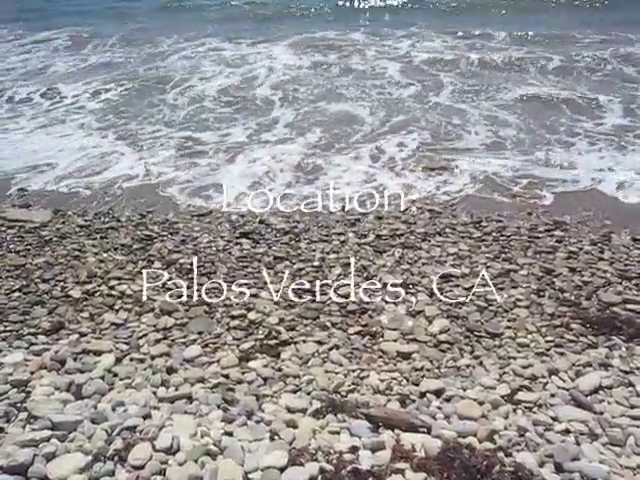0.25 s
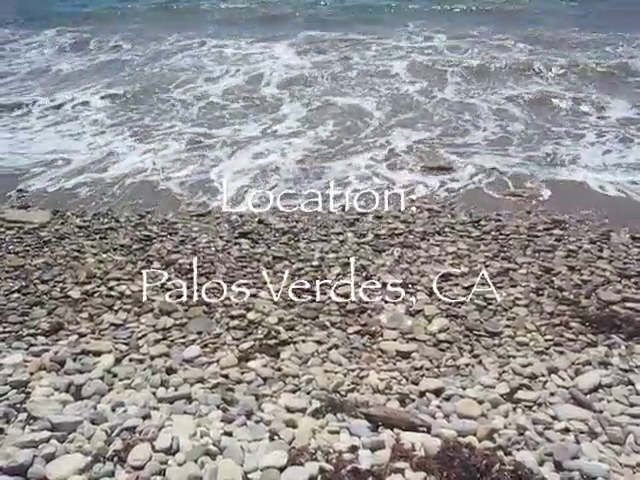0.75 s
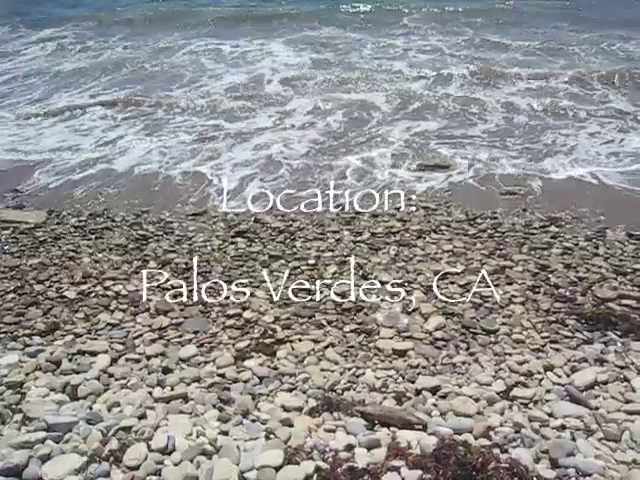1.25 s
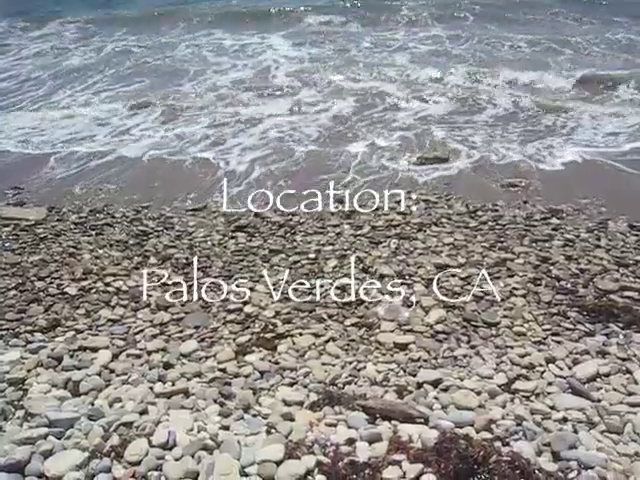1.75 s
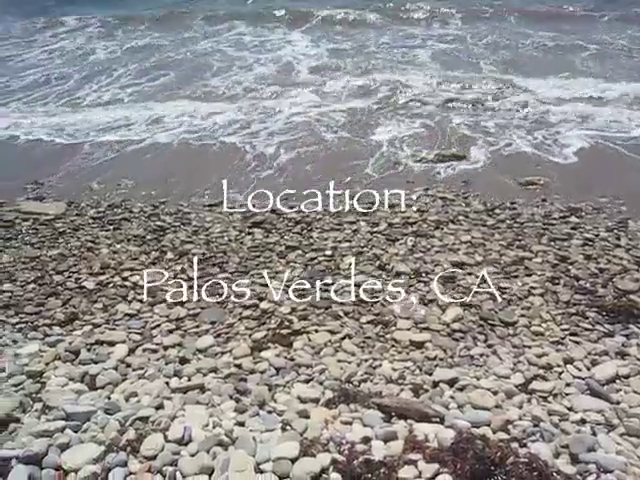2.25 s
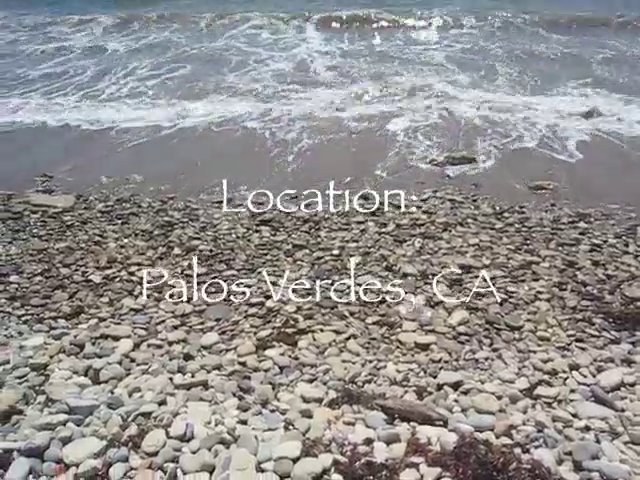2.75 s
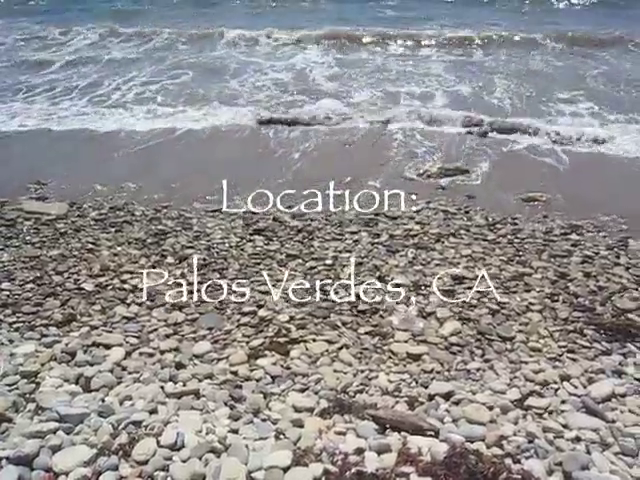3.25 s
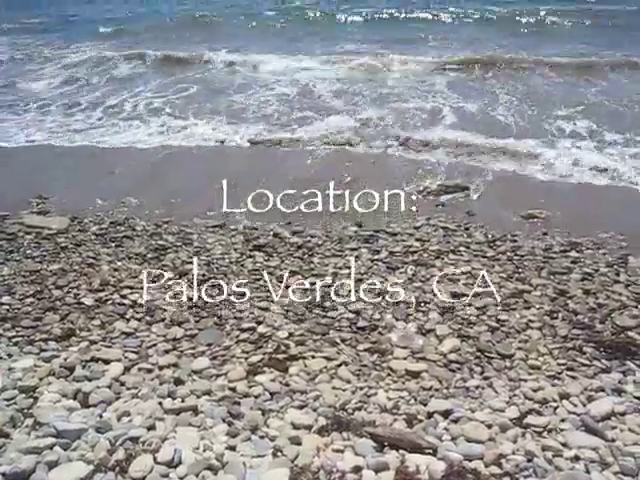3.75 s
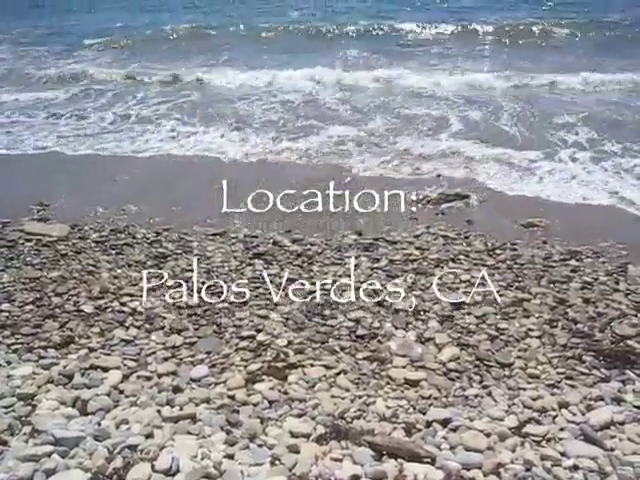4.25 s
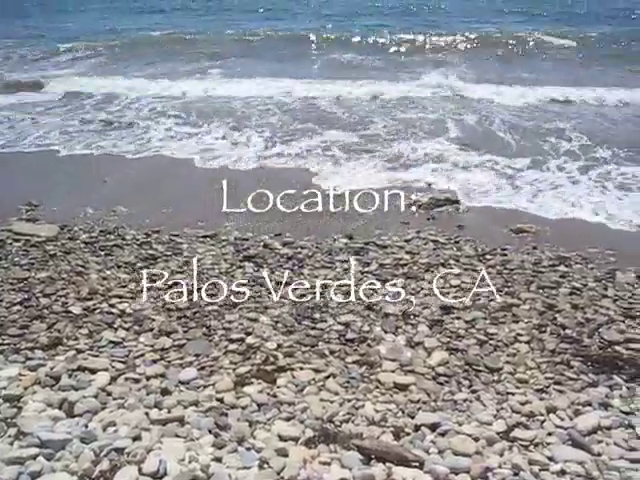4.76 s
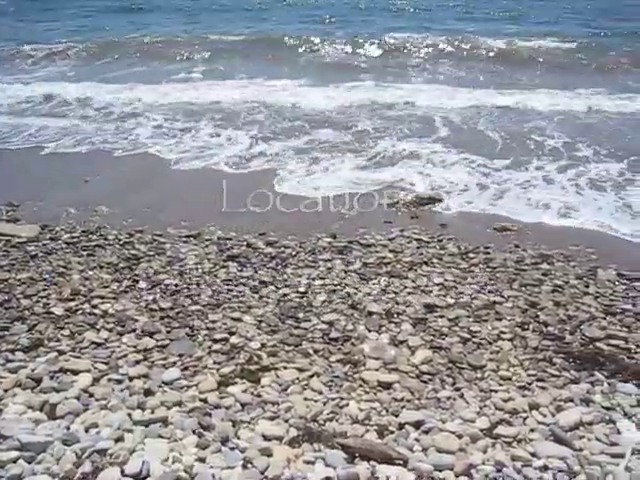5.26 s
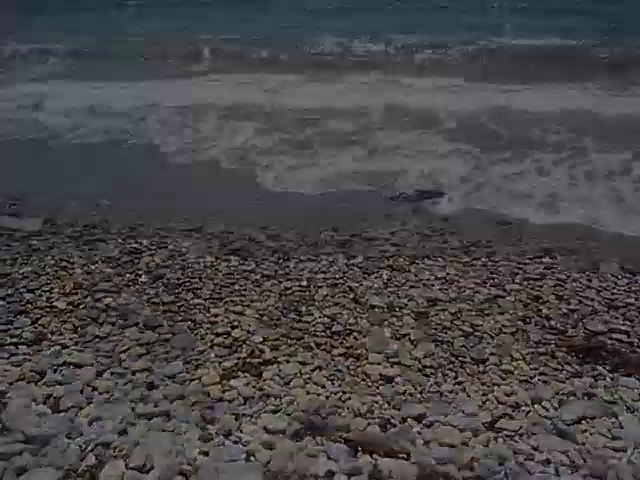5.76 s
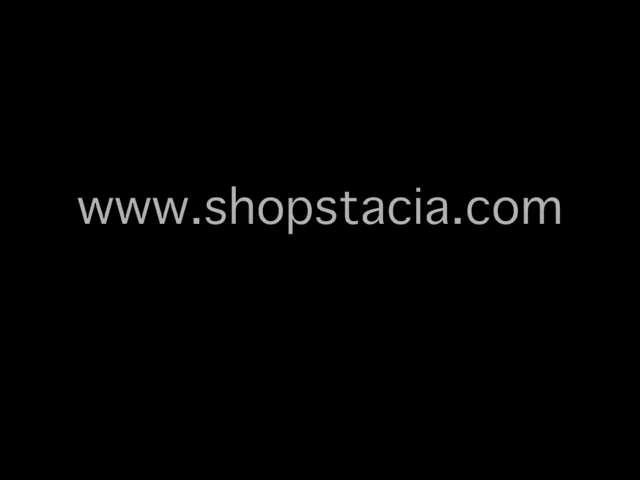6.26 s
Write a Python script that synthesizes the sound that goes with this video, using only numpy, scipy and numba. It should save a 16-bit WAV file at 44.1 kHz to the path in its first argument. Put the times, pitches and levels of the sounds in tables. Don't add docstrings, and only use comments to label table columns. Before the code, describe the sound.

A nearly mono pocket-camera sound close to a pebble shore. From 0 s a fairly soft foam hiss, with fizzing bubbles and fine crackle, carries a hollow tone around 1 kHz. Pebbles knock at about 0.2, 0.8 and 1.3 s, with more clicks to 1.6 s; watery gulps sound near 0.6 and 1.4 s. The wash swells to its fullest around 1.8 s, as distant breakers rumble near 2 s and wind buffets the microphone in low, fluttering thumps from 1.6 to 2.7 s. A tight, loud clatter of stones with gulps hits at 2.8-2.9 s, followed by knocks near 3.1 s. From 3.5 s the broad splashy wash stays steady, with a few clicks around 3.7-4.2 s, a gulp at 5 s and lighter wind bumps. Loud knocks briefly duck the level. At 5.5 s everything begins fading, stopping dead near 5.9 s; silence follows to about 6.4 s.

```python
import sys
import numpy as np
from scipy import signal
from scipy.io import wavfile
from scipy.ndimage import map_coordinates
from numba import njit

SR = 44100
rng = np.random.default_rng(int(sys.argv[2]) if len(sys.argv) > 2 else 0)


def makeup_ratio(level_db):
    decades = np.asarray(level_db, float) / 20
    return 10 ** decades


def waveform_to_disk(signal):
    frames = np.transpose(np.atleast_2d(signal))
    scaled = np.clip(frames, -1, 1) * 32767
    samples = np.round(scaled).astype(np.int16)
    wavfile.write(sys.argv[1], SR, samples)


N = 286205


def unit(x):
    return x / np.sqrt(np.mean(x ** 2))


def columns(table, s):
    rows = np.transpose(table)
    return [np.interp(s, rows[0], control) for control in rows[1:]]


def filtered(x, order, corner_hz, kind):
    return signal.sosfilt(signal.butter(order, corner_hz, kind, fs=SR, output="sos"), x)


def colour_db(points, hz):
    f, db = np.transpose(points)
    db = np.interp(np.log(hz + 1), np.log(f), db, left=-90, right=-90)
    return db - 10 * np.log10(np.mean(makeup_ratio(2 * db)))


def patches(hz, s, rate, octaves):
    field = rng.standard_normal((60, 400))
    place = np.meshgrid(np.log2(hz + 20) / octaves, s * rate, indexing="ij")
    return unit(map_coordinates(field, place, order=3, mode="mirror"))


def swells(s, floor_db, peaks, rise_s, fall_s):
    late = s - peaks[0][:, None]
    distance = np.where(late < 0, -late / rise_s, late / fall_s)
    shape = np.exp(-2 * distance ** 0.67)
    bursts = np.sum(makeup_ratio(2 * peaks[1])[:, None] * shape, axis=0)
    return 10 * np.log10(makeup_ratio(2 * floor_db) + bursts)


def shaped(x, gain_db):
    window, overlap = 1024, 768
    hz, s, z = signal.stft(x, SR, nperseg=window, noverlap=overlap)
    return signal.istft(z * makeup_ratio(gain_db(hz, s)), SR, nperseg=window, noverlap=overlap)[1][:N]


@njit
def ring(start, hz, cycles, size, glide):
    out = np.zeros(N)
    for k in range(len(start)):
        n = int(6 * cycles[k] * SR / hz[k]) + 1
        z = size[k] + 0j
        turn = np.exp((2j * np.pi - 1 / cycles[k]) * hz[k] / SR)
        rise = np.exp(2j * np.pi * hz[k] / SR * glide / n)
        for i in range(start[k], min(start[k] + n, N)):
            z, turn = z * turn, turn * rise
            out[i] += z.imag
    return out


def bubbles(count, low_hz, high_hz, cycles, scatter_db, glide):
    when, pitch, length, size, sign = rng.random((count, 5)).T
    start = (when * N).astype(np.int64)
    hz = low_hz * (high_hz / low_hz) ** pitch
    size_db = np.minimum(-scatter_db * np.log(1 - size), 12)
    size = makeup_ratio(size_db) * hz * np.sign(sign - .5)
    return unit(ring(start, hz, cycles * (.5 + length), size, glide))


# t/s, strength level/dB, spray level over the wash/dB,
# hollow of the breaking wave f/Hz, its ring level/dB
WAVES = [(0.0, -28.5, -1.5, 1170, 3), (0.2, -30, -2, 1050, 1.5), (0.9, -29, -5, 1094, 1),
         (1.05, -28.5, -2.5, 1040, 1), (1.18, -26.5, -1.5, 995, 2), (1.27, -24.5, -7.5, 960, 4),
         (1.42, -26.5, 0.5, 955, -0.5), (1.55, -24.5, 0, 945, 3.5), (1.8, -21, -1, 900, 1),
         (2.3, -22.5, -1.5, 990, 0), (2.75, -24.5, -1.5, 900, -0.5), (3.05, -23.5, 0.5, 1140, 3.5),
         (3.5, -23, 1.5, 1170, 5.5), (4.1, -23, 1.5, 1090, 2.5), (4.65, -22.5, -1.5, 1070, 2),
         (5.15, -22, -1, 1016, -0.5), (5.5, -22.5, 0, 1070, 0), (5.85, -27.5, -2.5, 1026, 1)]
# f/Hz, level per Hz/dB
FOAM_COLOUR = [(120, -19.5), (200, -12.5), (340, -15), (600, 0.5), (820, -1), (1060, -2), (1400, -4),
               (2300, -6), (3000, -8), (4100, -12), (5000, -14), (7900, -22.5), (11600, -24),
               (15900, -32.5)]


def surf():
    def gain_db(hz, s):
        wash_db, spray_db, hollow_hz, ring_db = columns(WAVES, s)
        octave = np.log2(hz[:, None] / 1000 + 0.0089)
        splash = np.exp(-((octave - 1.7) / 1.17) ** 2) * spray_db
        fizz = np.clip((octave - 2.0) / 0.85, 0, 1) * (2 + 0.2 * spray_db)
        hollow = ring_db * np.exp(-((hz[:, None] - hollow_hz) / 130) ** 2)
        swell = 0.54 * patches(hz, s, rate=3.1, octaves=7.2)
        swell = swell + 0.65 * patches(hz, s, rate=16.0, octaves=1.211)
        return colour_db(FOAM_COLOUR, hz)[:, None] + wash_db + 2.5 + splash + fizz + hollow + swell

    hiss = rng.standard_normal(N)
    burst = bubbles(count=9000, low_hz=348.0, high_hz=6000., cycles=1.32, scatter_db=2.5, glide=0.1)
    crackle = bubbles(count=12000, low_hz=900., high_hz=11900.0, cycles=0.29, scatter_db=2.5, glide=0.)
    return shaped(hiss + makeup_ratio(-13.5) * burst + makeup_ratio(-14.0) * crackle, gain_db)


# f/Hz, level per Hz/dB
BUFFET_COLOUR = [(12, -51), (20, -18.5), (54, -2), (117, 1.5), (289, -8.5), (400, -11.5), (520, -45),
                 (880, -120)]
# peak t/s, buffet level/dB, time to die away/s, thump level of the largest eddies/dB
WIND_GUSTS = [(.07, -50, .06, -5), (.5, -38, 0.064, 5), (.66, -38, 0.055, 7), (.81, -32.5, 0.14, -1),
              (1.2, -41, .05, 3), (1.45, -39.5, 0.043, 7), (1.6, -27, 0.06, -2), (1.79, -34.5, 0.14, -6.5),
              (2.06, -21.5, 0.077, -18), (2.13, -24, 0.03, -20), (2.24, -30, .06, -14),
              (2.4, -27, 0.12, -3.5), (2.53, -26, 0.088, -2.5), (2.69, -26.5, 0.057, -9.5),
              (2.83, -39, .04, 2), (2.97, -33.5, 0.041, 4.5), (3.54, -43, 0.056, 2.5),
              (3.9, -37.5, 0.18, -2), (4.2, -39, .06, -5), (4.5, -41, 0.067, 2.5), (4.8, -39, .1, -1.5),
              (4.94, -30.5, .06, 2), (5.05, -35.5, 0.045, 3), (5.49, -30.5, 0.094, 1),
              (5.82, -40.5, 0.051, 0)]


def wind():
    def buffet_db(hz, s):
        peak_s, peak_db, fall_s, extra_db = np.transpose(WIND_GUSTS)
        fall_s = fall_s[:, None]
        rise_s = 0.69 * fall_s
        breeze_db = -46
        push_db = swells(s, breeze_db, (peak_s, peak_db), rise_s, fall_s)
        thump_db = swells(s, breeze_db - 5.5, (peak_s, peak_db + extra_db), rise_s, fall_s) - push_db
        large = np.clip(-np.log2(hz[:, None] / 110 + .01) / 1.8, 0, 1)
        flutter_db = 2.0 * patches(hz, s, rate=22.0, octaves=3.2)
        return colour_db(BUFFET_COLOUR, hz)[:, None] + thump_db * large + push_db + 3.5 + flutter_db

    strength_db = -1.2 * np.log(rng.random(N // 256 + 1)).repeat(256)[:N]
    eddies = rng.standard_normal(N) * makeup_ratio(strength_db)
    return shaped(unit(eddies), buffet_db)


# peak t/s, rumble level/dB
FAR_BREAKERS = [(0.0, -33), (.8, -36.5), (1.49, -30.5), (1.95, -23.5), (2.3, -33), (2.65, -27.5),
                (3.1, -34.5), (3.5, -37.5), (4.15, -35.5), (4.75, -40.5), (5.25, -30.5), (5.55, -37.5)]


def far_breakers():
    def rumble_db(hz, s):
        far = colour_db([(90, -33.0), (170, -1), (280, -3.5), (400, -6.5), (600, -23.0)], hz)
        fall_db = swells(s, -37, np.transpose(FAR_BREAKERS), rise_s=0.13, fall_s=.12)
        return far[:, None] + fall_db + 0.8 + 1.7 * patches(hz, s, rate=7.4, octaves=1.5)

    return shaped(rng.standard_normal(N), rumble_db)


# t/s, peak level/dB, f/Hz, ring/cycles
WATER_GULPS = [(.083, -14, 610, 1.5), (.6172, -9, 600, 1.3), (.847, -16, 700, 1.5), (1.107, -14, 700, 1.4),
               (1.3695, -4, 820, 1.1), (2.156, -10, 660, 1.5), (2.9025, -8, 750, 1.2),
               (2.9115, -4, 1050, 1.5), (3.198, -10, 684, 1.5), (5.011, -9, 592, 1.5),
               (5.554, -11, 1096, 1.5)]


def gulps():
    s, peak_db, hz, cycles = np.transpose(WATER_GULPS)
    rings = ring((s * SR).astype(np.int64), hz, cycles, makeup_ratio(peak_db - 0.5), 0.27)
    return filtered(rings, 2, 300, "high")


# t/s, level/dB, lowest f/Hz, highest f/Hz
TREBLE_PUFFS = [(0.107, -48.0, 6300, 7500), (0.343, -46.0, 5200, 13300), (0.805, -48.0, 4200, 5100),
                (1.993, -48.0, 11700, 13000), (2.433, -39.0, 4300, 5100), (2.526, -39.0, 4200, 7900),
                (2.546, -47.0, 4200, 7900), (2.571, -40.0, 4200, 5000), (3.06, -46.0, 8300, 10000),
                (3.267, -38.0, 4600, 11300), (4.428, -42.0, 6900, 15300), (4.868, -39.0, 5700, 6800),
                (4.965, -37.0, 4200, 5100), (5.034, -45.0, 11000, 12700)]


def widenings():
    half = 1024
    side = np.zeros(N)
    for s, db, low_hz, high_hz in TREBLE_PUFFS:
        noise = filtered(rng.standard_normal(2 * half), 6, [low_hz, high_hz], "band")
        middle = int(s * SR)
        side[middle - half:middle + half] += makeup_ratio(db + 1) * unit(noise) * np.hanning(2 * half)
    return side * np.array([[1], [-1]])


# t/s, peak level/dB, lowest ring f/Hz, highest ring f/Hz, rattle length/ms
STONE_KNOCKS = [(.132, -15.5, 1000, 2400, 8.6), (0.1826, -7, 890, 3900, 7.1), (.449, -15, 2000, 3300, 6),
                (.663, -15, 1190, 3020, 7.5), (0.8212, -9.5, 900, 4240, 4), (1.2744, -7, 2070, 6270, 2.6),
                (1.404, -12, 1500, 4500, 3), (1.422, -10, 1300, 3000, 3.5), (1.4617, -12.5, 696, 2480, 2.3),
                (1.547, -17.5, 1010, 5000, 6), (1.576, -12, 1490, 6500, 5.8), (2.828, -8, 672, 2640, 4.7),
                (2.8832, -6, 1510, 6000, 2), (2.886, -7, 600, 2300, 1.8), (2.894, -10.5, 1300, 2800, 2.5),
                (2.9108, -3, 2500, 3400, 2.2), (2.911, -6, 4400, 5500, 2.2), (2.92, -6.5, 1812, 2800, 1.5),
                (3.039, -6, 995, 4480, 2), (3.097, -10.5, 900, 5470, 3.4), (3.701, -12, 2180, 4800, 2.7),
                (3.911, -11.5, 2500, 5000, 3), (4.128, -6, 803, 2830, 10), (4.205, -12, 2500, 8000, 1.7)]


def knocks(count):
    out = np.zeros(N)
    for s, peak_db, low_hz, high_hz, length_ms in STONE_KNOCKS:
        when, size, pitch = rng.random((3, count))
        when[::5] *= .1
        start = (SR * (s + when * length_ms / 1000)).astype(np.int64)
        hz = low_hz * (high_hz / low_hz) ** ((np.arange(count) + pitch) / count)
        force = np.sign(size - .5) * (.5 + size) * hz ** .15 * np.exp(-.5 * when)
        rattle = ring(start, hz, np.full(count, 2.2), force, .05)
        rattle = filtered(rattle, 2, [.85 * low_hz, 1.05 * high_hz], "band")
        out += rattle * makeup_ratio(peak_db) / np.abs(rattle).max()
    return out


def scene():
    shore = surf() + knocks(count=24) + gulps()
    late_ms, bounce_db, dulled_above_hz = 1.985, -15, 4000
    dull = signal.butter(2, dulled_above_hz, fs=SR, output="sos")
    bounce = signal.sosfiltfilt(dull, shore)
    bounce = np.interp(np.arange(N) - late_ms * SR / 1000, np.arange(N), bounce)
    return np.tile(shore + makeup_ratio(bounce_db) * bounce + wind() + far_breakers(), (2, 1))


@njit
def follow(x, attack, release):
    out, e = np.empty(len(x)), .1
    for i in range(len(x)):
        e += (abs(x[i]) - e) * (attack if abs(x[i]) > e else release)
        out[i] = e
    return out


def gain_control(heard):
    ceiling_db, firmness, attack_s, release_s = -13.5, 0.93, 0.0012, 0.063
    envelope = follow(heard, 1 / (attack_s * SR), 1 / (release_s * SR))
    gain = np.minimum(1, makeup_ratio(ceiling_db) / envelope) ** firmness
    return np.roll(gain, 70)


# t/s, level/dB
FADE_OUT = [
    (0, 0.5),
    (5.5, 0.5),
    (5.62, -0.5),
    (5.75, -2),
    (5.887, -7.5),
]


def editor_fade():
    s = np.arange(N) / SR
    return makeup_ratio(columns(FADE_OUT, s)[0]) * (s < 5.8875)


def low_pass(x):
    return signal.sosfilt(signal.butter(12, 16090, fs=SR, output="sos"), x)


def record(dry):
    heard = filtered(dry, 1, 45, "high")
    rounded = np.tanh(heard * gain_control(heard[0]) / .8) * .8
    mix = rounded * editor_fade() + widenings()
    top = signal.ellip(10, .2, 70, 15750, fs=SR, output="sos")
    return low_pass(signal.sosfilt(top, mix))


dry = scene()
out = record(dry)
waveform_to_disk(out)
```